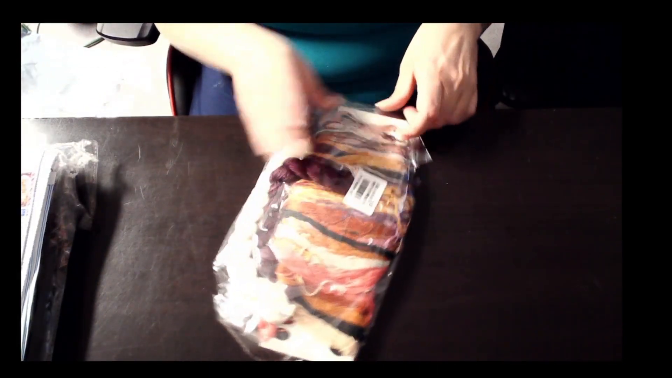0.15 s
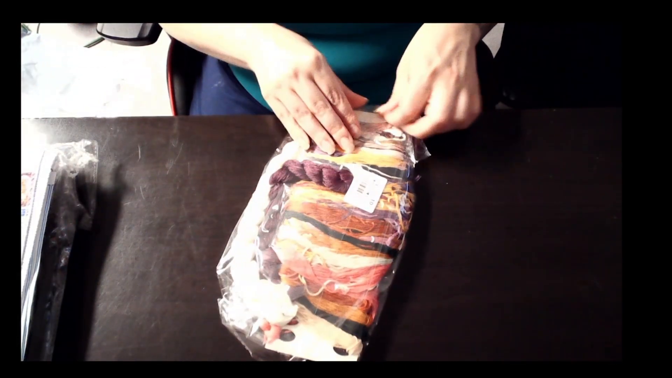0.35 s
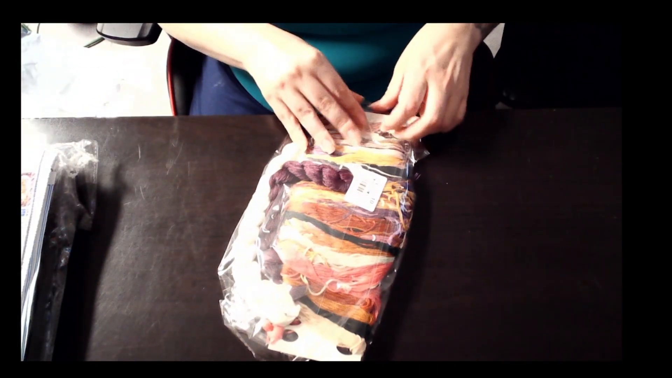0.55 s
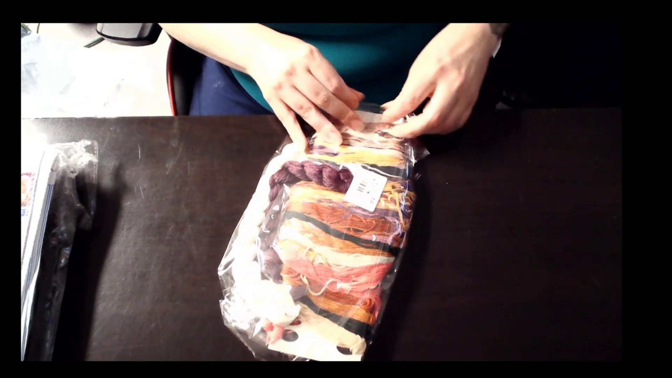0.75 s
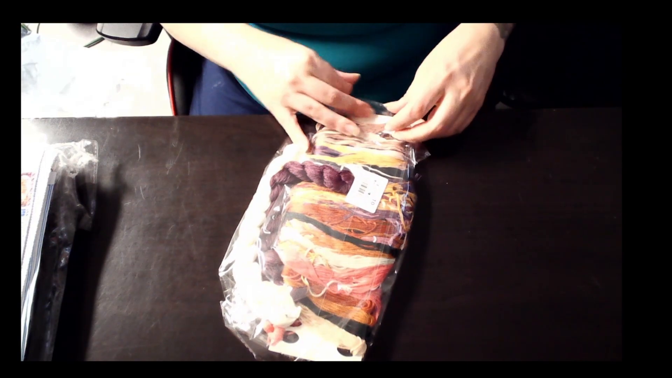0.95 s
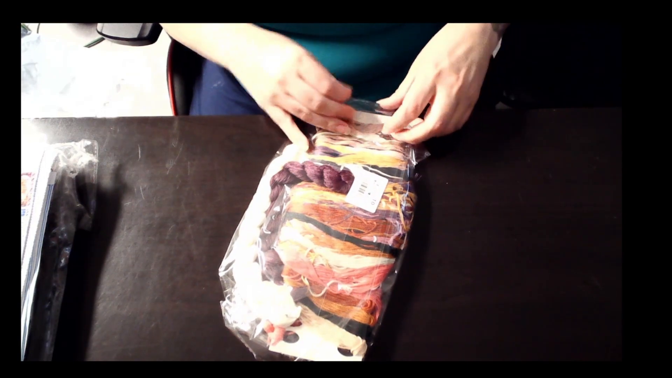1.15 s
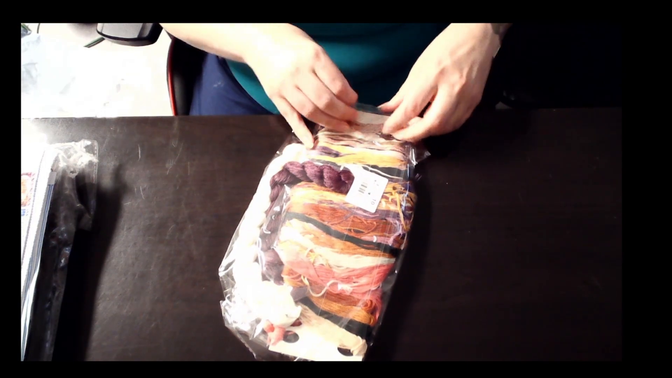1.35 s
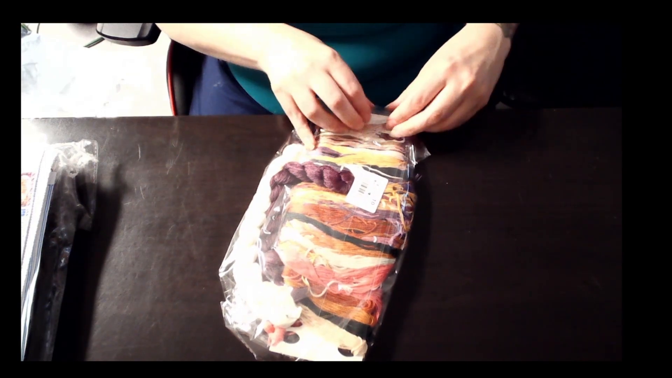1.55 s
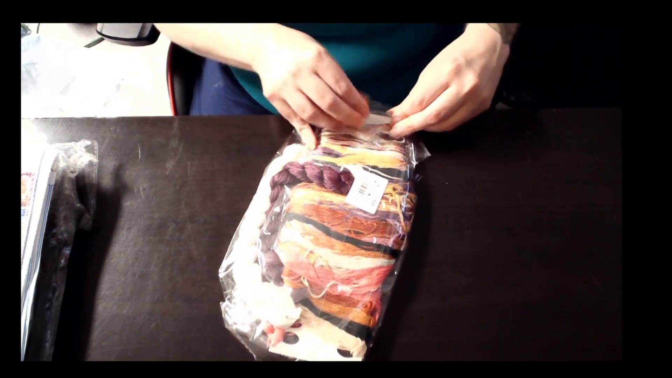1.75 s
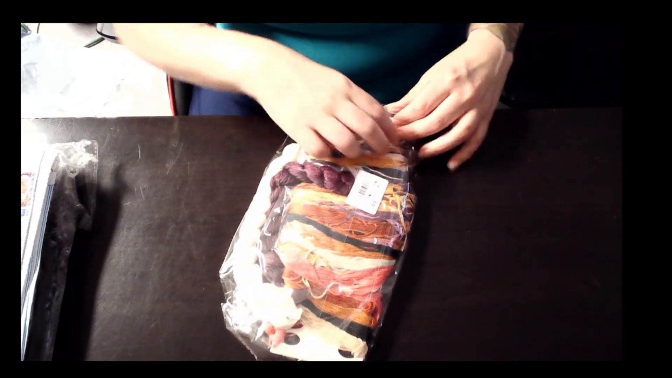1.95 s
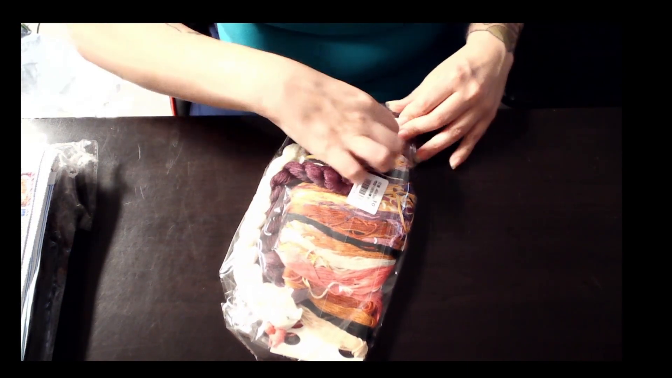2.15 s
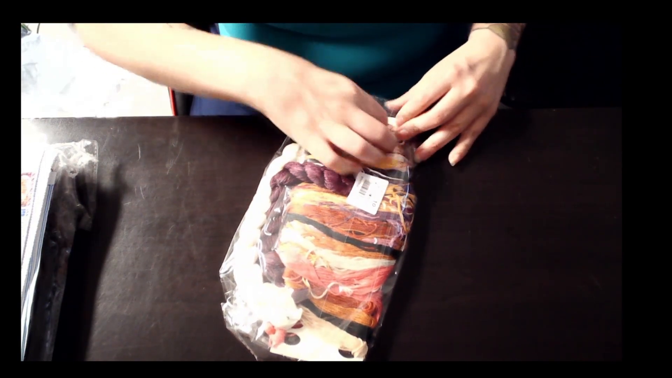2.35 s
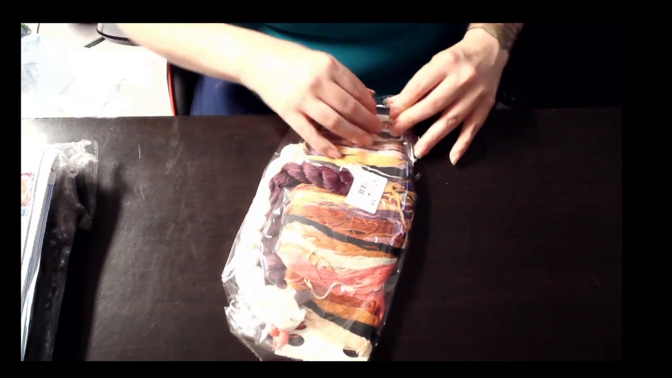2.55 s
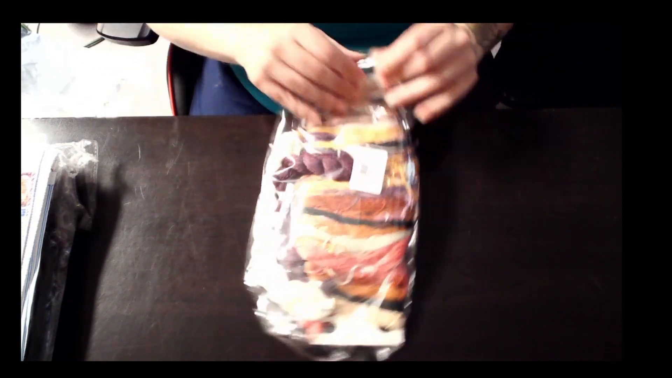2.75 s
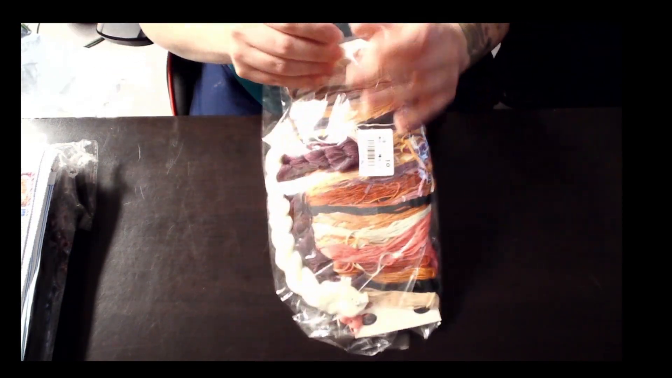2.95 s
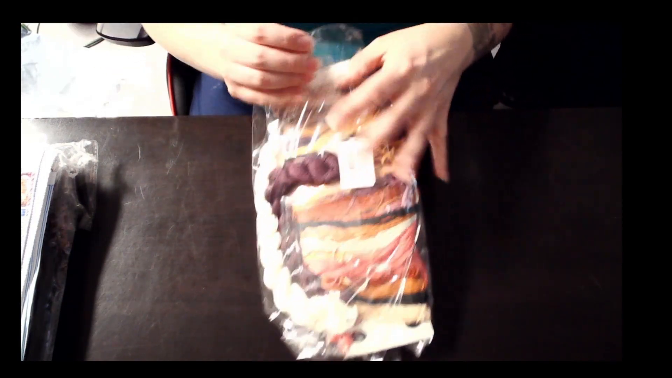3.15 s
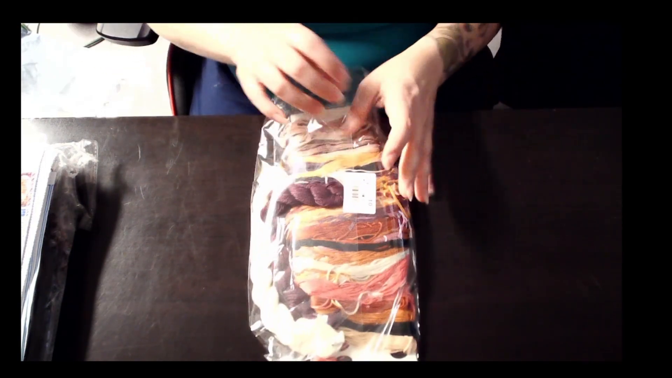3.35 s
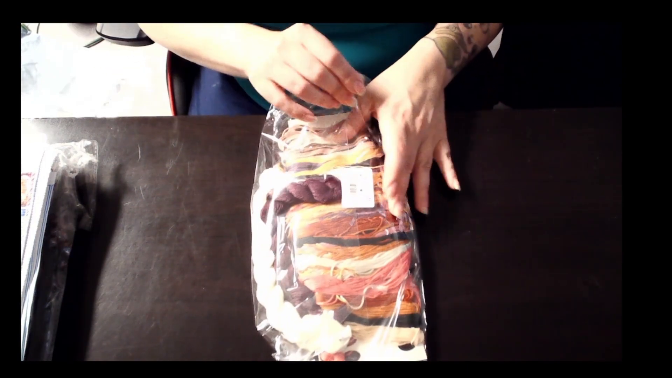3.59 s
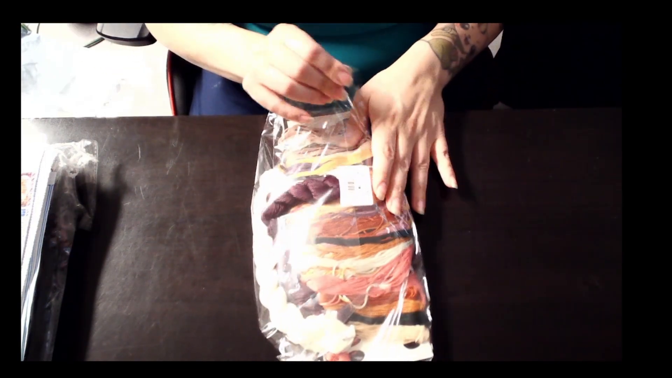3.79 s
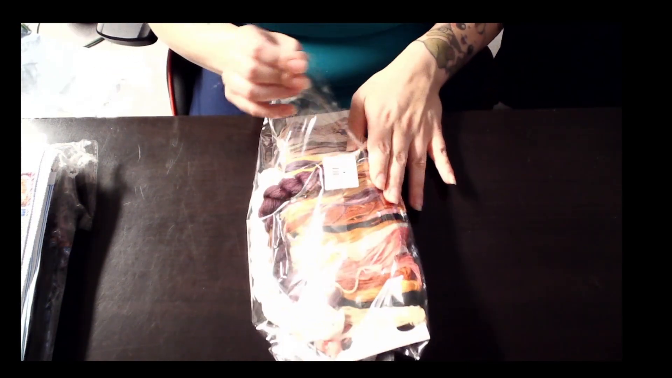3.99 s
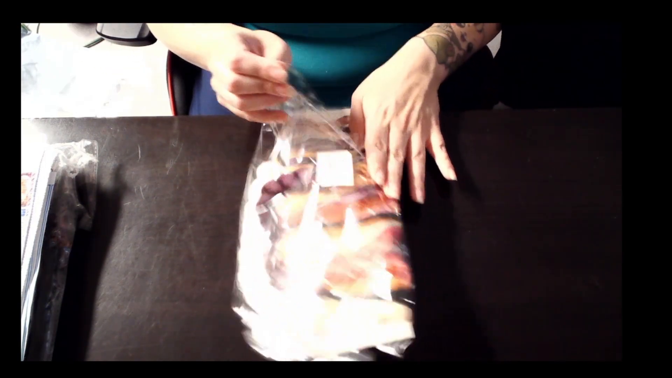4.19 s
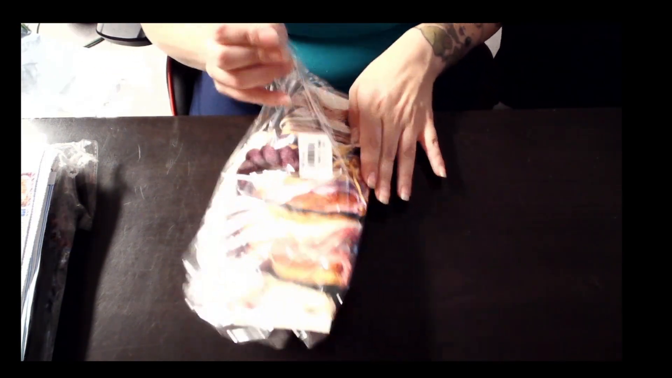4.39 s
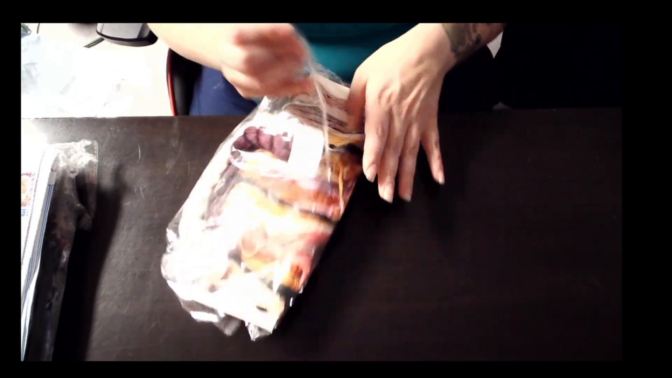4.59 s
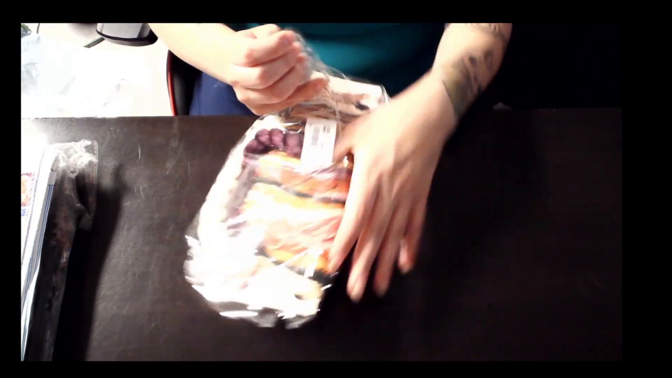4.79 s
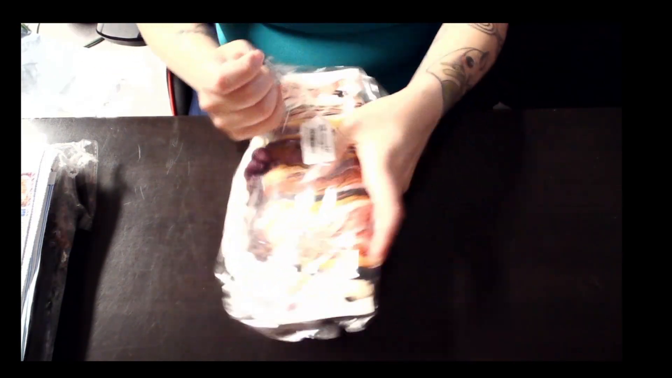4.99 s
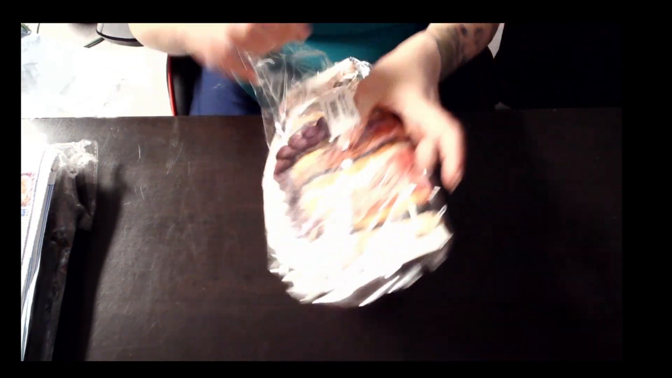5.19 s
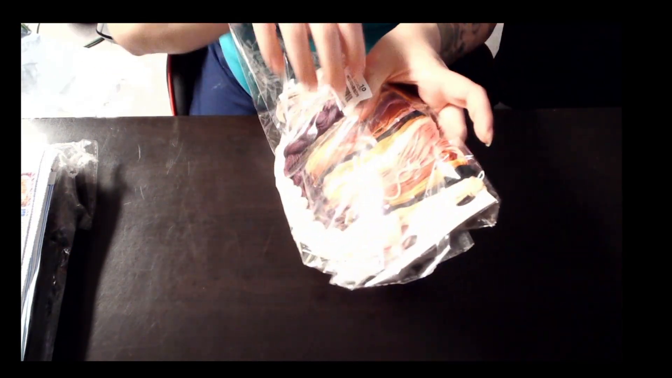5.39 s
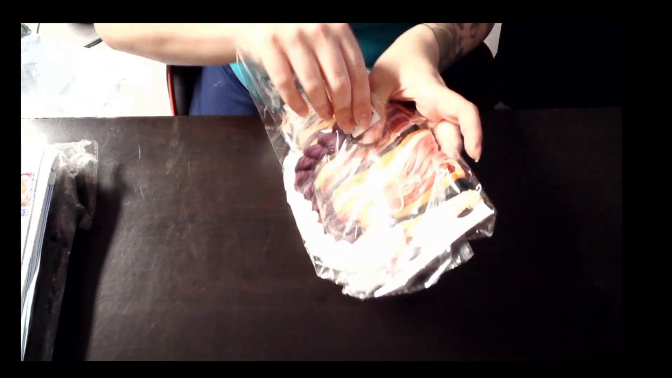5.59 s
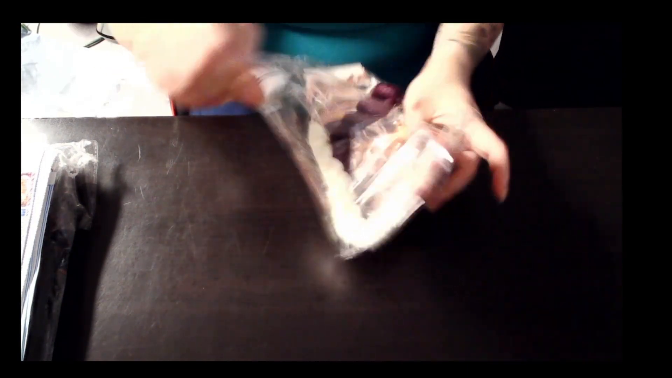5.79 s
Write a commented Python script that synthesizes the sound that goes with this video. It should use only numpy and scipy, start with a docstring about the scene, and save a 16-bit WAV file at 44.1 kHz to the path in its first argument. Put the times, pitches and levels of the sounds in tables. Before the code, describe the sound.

Fingers pick at thin crisp plastic with irregular ticks, small crackles and short gaps. Lifting and turning the bag brings busier rustling near the middle and stronger crackling later; after a brief lull the sharpest crush arrives last. The table gives only a faint low drone as the bag drags. Close and nearly dry, through a small band-limited microphone with low hiss.

```python
"""Hands pick at, turn and lift a stiff clear plastic bag full of soft yarn on a wooden table.
From the start creases snap one by one over a crackle: clustered noise bursts, each coloured by a ring.
From 0.4 s drags set the table top droning faintly: friction noise picked out by two modes.
Snaps crowd and grow near 2.7-3.0 s, again at 4.2-5.2 s, and are loudest at 5.7 s, just before the end.
A small narrow-band microphone dulls it all; a faint mirror image and hiss lie above and beneath."""
import sys
import numpy as np
from scipy import signal
from scipy.fft import rfft, irfft, next_fast_len
from scipy.io import wavfile
from scipy.ndimage import uniform_filter1d, map_coordinates

SR = 44100
rng = np.random.default_rng(int(sys.argv[2]) if len(sys.argv) > 2 else 0)


def master(y):
    """Save y as 16-bit WAV."""
    cut = np.clip(np.atleast_2d(y).T, -1, 1)
    pcm = np.round(cut * 32767)  # scale
    wavfile.write(sys.argv[1], SR, pcm.astype(np.int16))


def elevation(decibels):
    """Turn decibel levels (scalar or array-like) into linear amplitude ratios."""
    levels = np.asarray(decibels, float)
    return 10 ** (levels / 20)


N = 257367  # samples

# moves of the fingers on the film, before clumping: start [t/s], length [t/s],
# crackle at the start [level/dB], change by the end [level/dB], large folds re crackle [level/dB]
FINGER_MOVES = [(0, 0.097, -46.5, -17, -17.5), (0.113, 0.074, -56.5, -3.5, -25.5),
                (0.244, 0.15, -57, 3.5, -24), (0.436, 0.19, -58.5, -3, -24),
                (0.687, 0.019, -66.5, -8, -5.5), (0.777, 0.033, -73, 5, -23),
                (0.848, 0.096, -54, -7, -25.5), (0.987, 0.077, -64, 4, -17.5),
                (1.099, 0.054, -59.5, -1, -19.5), (1.2, 0.027, -59.5, 2.5, -27),
                (1.32, 0.047, -59, -3, -28), (1.412, 0.14, -59, -8, -23.5), (1.597, 0.033, -63.5, -2, -26),
                (1.678, 0.025, -50.5, -14, -21), (1.751, 0.083, -72.5, -5.5, -19),
                (1.865, 0.06, -58, 0, -20.5), (1.999, 0.19, -56, -5, -24), (2.251, 0.021, -73, -4, -21),
                (2.29, 0.047, -56.5, 1.5, -28), (2.382, 0.16, -66, 11, -20), (2.595, 0.1, -63.5, 15, -22),
                (2.705, 0.099, -51.5, -2, -19), (2.834, 0.21, -53, 7, -19.5), (3.085, .29, -60, 3, -16.5),
                (3.377, 0.092, -63.5, 3, -19), (3.505, 0.026, -52, 1, -13.5), (3.584, 0.18, -52, -4, -14.5),
                (3.832, 0.1, -45, -13, -14), (3.98, 0.035, -54.5, 1, -23.5),
                (4.105, 0.33, -64, -2.5, -14.5), (4.204, 0.018, -57.5, 7, -17.5),
                (4.252, 0.13, -39.5, -13.5, -15), (4.421, 0.083, -56, 4.5, -20.5),
                (4.563, 0.057, -50.5, 8.5, -17.5), (4.693, 0.037, -69.5, 0, -16),
                (4.737, 0.17, -52.5, -4.5, -16), (4.962, 0.1, -47.5, 0.5, -20.5),
                (5.108, 0.15, -50.5, -8, -19), (5.368, 0.065, -48, -26, -15),
                (5.444, 0.092, -61, -11.5, -18), (5.564, 0.082, -54.5, 10, -13.5),
                (5.687, 0.019, -29.5, -0.5, -16.5), (5.724, 0.13, -35, -14, -13.5)]
# snaps of single creases: onset [t/s], peak before the tick trim [level/dB], ring [f/Hz],
# body re that peak before the body trim [level/dB]
CREASE_SNAPS = [(0.0034, -23.5, 6950, -39), (0.0603, -37, 6650, -31), (0.1075, -44, 6500, -29),
                (0.1235, -39, 6800, -38), (0.1531, -31, 3320, -41), (0.2483, -46, 6200, -34),
                (0.2596, -36.5, 5830, -23), (0.2996, -36, 6740, -36), (0.3381, -30, 3600, -32),
                (0.3781, -36.5, 6400, -34), (0.4375, -35, 5800, -50), (0.4708, -36, 6300, -38),
                (0.478, -34, 6140, -19.5), (0.5469, -37, 5850, -27), (0.5535, -39, 5740, -26.5),
                (0.614, -33.5, 4770, -53), (0.6872, -32.5, 6700, -27), (0.7794, -32, 5760, -48),
                (0.836, -31.5, 4330, -50), (0.857, -32, 6800, -35), (0.8963, -32.5, 3950, -31),
                (0.9815, -42.5, 3730, -39), (0.9976, -38, 3270, -31), (1.0102, -37, 3220, -26),
                (1.0316, -42, 4480, -20), (1.0932, -42.5, 3700, -24), (1.1209, -35.5, 5800, -19),
                (1.1596, -35.5, 7000, -47), (1.2153, -37.5, 3600, -33), (1.2284, -40, 5940, -35),
                (1.276, -41.5, 3400, -32), (1.3213, -45.5, 3570, -44), (1.3443, -36, 6700, -51),
                (1.4088, -34.5, 3910, -32.5), (1.4626, -40, 6740, -27), (1.512, -38.5, 5600, -50),
                (1.5449, -35.5, 5050, -50), (1.6023, -29.5, 3880, -52), (1.6267, -34.5, 3690, -51),
                (1.6737, -31, 3480, -31), (1.701, -34.5, 5300, -46), (1.7438, -47.5, 5070, -36),
                (1.7953, -50, 6200, -48), (1.8635, -32.5, 5900, -53), (1.9886, -41.5, 4640, -34),
                (2.0057, -37, 3560, -37), (2.0505, -24.5, 5930, -29.5), (2.0827, -31, 6350, -40),
                (2.1097, -29.5, 3930, -33), (2.164, -36, 3500, -29), (2.179, -38.5, 3500, -45),
                (2.2204, -53, 5740, -23), (2.25, -38.5, 6440, -27), (2.2967, -30.5, 6400, -49),
                (2.322, -44, 6870, -37), (2.378, -39, 6770, -32), (2.406, -38.5, 6700, -23),
                (2.4613, -31, 3900, -53), (2.4862, -35.5, 6860, -36), (2.5182, -30, 3760, -36),
                (2.5379, -34, 4700, -36), (2.5884, -33, 6040, -46), (2.6506, -36, 6150, -30),
                (2.7063, -32.5, 3650, -23.5), (2.7188, -24, 6560, -35), (2.7827, -26.5, 7060, -38),
                (2.8419, -25.5, 3560, -39), (2.8797, -27.5, 7000, -24), (2.8844, -28.5, 6410, -14.5),
                (2.9303, -25, 5560, -28.5), (2.9506, -18, 5700, -26), (2.9903, -25, 5030, -25.5),
                (3.0098, -25, 5370, -27), (3.0182, -28.5, 5600, -30), (3.0544, -31.5, 6380, -23),
                (3.096, -33, 6760, -21), (3.1319, -36.5, 5670, -24), (3.169, -30, 6420, -27.5),
                (3.1914, -34.5, 6060, -32), (3.2298, -32, 6100, -21.5), (3.3211, -38, 5360, -38),
                (3.3426, -32.5, 4870, -33), (3.3646, -33, 6560, -37), (3.4515, -40, 3000, -27),
                (3.5051, -38.5, 6650, -13), (3.5795, -35, 5170, -35), (3.6586, -33.5, 3460, -24),
                (3.7546, -39, 7000, -9), (3.7744, -39, 6840, -21), (3.8247, -33, 6300, -19),
                (3.829, -34, 5500, -19), (3.8714, -24, 5200, -39), (3.9579, -34, 6600, -38),
                (4.0092, -31.5, 3680, -31), (4.0756, -34, 6200, -40), (4.0933, -40, 6860, -37),
                (4.124, -26.5, 6070, -49), (4.1704, -38.5, 6500, -35), (4.2287, -29, 5320, -35),
                (4.2351, -27, 4950, -42), (4.2422, -21, 5510, -37), (4.2681, -16.5, 6400, -47),
                (4.279, -16.5, 6460, -29), (4.3296, -22.5, 6890, -27), (4.35, -23.5, 6730, -30),
                (4.356, -25.5, 6540, -26), (4.3774, -26, 5830, -23), (4.4017, -24, 6890, -42),
                (4.4306, -22.5, 6040, -23), (4.4747, -34.5, 5400, -28), (4.4967, -23, 5600, -29.5),
                (4.54, -23.5, 7000, -33.5), (4.572, -29, 6700, -30), (4.5947, -23, 5400, -24),
                (4.6146, -22.5, 2950, -35), (4.6314, -37, 4830, -39), (4.6847, -33, 6700, -38),
                (4.7485, -22.5, 5700, -38), (4.8009, -22.5, 3680, -34), (4.808, -26, 3680, -42.5),
                (4.8556, -26, 6900, -34), (4.8797, -25.5, 4640, -29), (4.8893, -20, 7050, -41),
                (4.9347, -25, 5900, -49), (4.9506, -26, 6810, -41), (4.995, -22, 5200, -30),
                (5.0276, -24.5, 5050, -28.5), (5.0624, -24.5, 6220, -20), (5.1452, -24.5, 6360, -19.5),
                (5.1564, -24, 5800, -30), (5.26, -37, 3870, -39), (5.2744, -34.5, 4520, -30.5),
                (5.3598, -30, 6900, -23), (5.4043, -35.5, 6790, -35), (5.4405, -40, 5860, -36),
                (5.456, -33, 5400, -25.5), (5.5153, -39.5, 6680, -47), (5.5705, -40.5, 6700, -5.5),
                (5.6028, -38, 5070, -26), (5.6426, -32, 3330, -34), (5.6584, -25, 5000, -24.5),
                (5.677, -25, 6700, -21), (5.69, -9.5, 6760, -35), (5.697, -15.5, 6900, -21),
                (5.7043, -15, 6700, -32), (5.724, -25, 4090, -27), (5.742, -15.5, 6000, -24),
                (5.7501, -17.5, 6270, -25), (5.7628, -23, 5870, -27), (5.7694, -25, 4600, -25),
                (5.7825, -29, 4800, -23), (5.7936, -24.5, 5900, -18), (5.8028, -24, 6790, -31),
                (5.8187, -31.5, 5810, -20)]
# spectrum of small creases: [f/Hz], relative [level/dB]
SMALL_CREASE_SPECTRUM = [(1500, -48.5), (2500, -7.5), (3400, -4.5), (5700, -5.5), (6900, -2), (9000, -6.5)]
# spectrum of large folds: [f/Hz], relative [level/dB]
LARGE_FOLD_SPECTRUM = [(200, -32.5), (500, -15), (900, -12.5), (1300, -8.5), (1650, -3), (2100, -1),
                       (2700, -6.5), (3500, -7.5), (5000, -35.5)]
# reverberation: [f/Hz], time to fall 60 dB [t/s]
REVERB_TIME = [(300, 0.14), (2500, 0.15), (7000, 0.14)]
# drags of the bag over the table, before wavering: start [t/s], length [t/s],
# drone [level/dB], rumble [level/dB]
BAG_DRAGS = [(0.437, 0.05, -91, -100), (0.686, .01, -82, -94), (0.863, 0.047, -80.5, -100),
             (1.091, 0.015, -81.5, -100), (1.49, 0.0047, -82, -86.5), (1.967, 0.022, -94, -90.5),
             (2.178, 0.078, -78, -86), (2.434, 0.069, -89, -93), (2.806, 0.094, -77, -93),
             (2.93, 0.1, -70, -83), (3.208, 0.11, -80, -86), (3.634, 0.0071, -78, -81),
             (3.71, 0.009, -89, -100), (3.935, 0.023, -94, -93), (4.263, .05, -79.5, -71),
             (4.34, 0.052, -83, -80.5), (4.614, 0.23, -73, -82), (4.984, 0.026, -74, -82.5),
             (5.077, 0.013, -75, -72.5), (5.12, 0.046, -76.5, -89), (5.24, .03, -83, -100),
             (5.359, 0.0051, -77.5, -79.5), (5.506, 0.12, -78.5, -87), (5.695, 0.038, -72.5, -67.5)]
# brisk slides that wake the upper mode, before wavering: start [t/s], length [t/s], [level/dB]
BRISK_SLIDES = [(2.702, 0.15, -89), (2.83, 0.14, -78), (5.012, 0.15, -78)]
# modes of the table top, lower then upper: centre [f/Hz], width before the skirts are steepened [f/Hz]
TABLE_MODES = [(195, 36.3), (635, 63)]
# spectrum of the sliding rumble: [f/Hz], relative [level/dB]
RUMBLE_SPECTRUM = [(15, -45), (35, -15), (90, 1.5), (140, -3.5), (300, -8), (550, -23.5), (900, -23.5)]
# noise estimate of the suppressor: [f/Hz], per transform bin [level/dB]
NOISE_ESTIMATE = [(100, -114), (600, -102), (1500, -103), (2500, -94.5), (4000, -102), (7500, -102)]
# band edge of the microphone: [f/Hz], gain [level/dB]
MICROPHONE_BAND = [(7100, 2.5), (7400, -1), (7700, -18.5), (7900, -31), (8300, -60.5), (9000, -99)]
# response that shapes the mirror image: [f/Hz], gain [level/dB]
MIRROR_RESPONSE = [(7800, -89.5), (8100, 0.5), (8500, -14.5), (8900, -28.5), (9200, -43.5), (10000, -63),
                   (16000, -89)]
# spectrum of the hiss: [f/Hz], relative [level/dB]
HISS_SPECTRUM = [(20, 3), (200, -4), (600, -6), (2500, -5), (7000, -25.5), (8000, -12.5), (11000, -18),
                 (15500, -29), (16000, -35)]

GRIP_DB_PER_S, LET_GO_DB_PER_S = 996.5, 500.5  # how a move starts and stops
SETTLING_DB, SETTLING_FOLDS_DB = -85.5, -94  # the film creeping between moves, before clumping
CRUSH_DB = -43.5  # about this level the many creases giving at once even the crackle out
RISE_DB_PER_S, FALL_DB_PER_S = 491, 388  # how a drag starts and stops
REST_DRONE_DB, REST_RUMBLE_DB = -101, -100  # the table with the bag at rest, before wavering
INNER_RATE_HZ = 16000
LEAD_S = 0.002  # room for the rise of a burst ahead of its flip


def unit(x):
    """Normalisation to unit root-mean-square amplitude."""
    return x / np.sqrt(np.mean(x ** 2) + 1e-20)


def along(points, hz):
    """Interpolation of (f/Hz, value) points on a logarithmic frequency axis."""
    f, v = np.transpose(points)
    return np.interp(np.log(hz + 1), np.log(f + 1), v)


def wobble(rate):
    """Slow random modulation: a smooth curve through rate random knots a second."""
    knots = rng.standard_normal(int(N * rate / SR) + 4)
    return map_coordinates(knots, [np.arange(N) * rate / SR])


def filtered(x, response):
    """Linear filtering: the spectrum of x is multiplied by a response of frequency."""
    m = next_fast_len(N + 8192)
    return irfft(rfft(x, m) * response(np.fft.rfftfreq(m, 1 / SR)), m)[:N]


def coloured(x, spectrum):
    """Spectral shaping of x by (f/Hz, level/dB) points."""
    return filtered(x, lambda hz: elevation(along(spectrum, hz)))


def strokes(start, length, rise_db_per_s, fall_db_per_s, *levels_db, change_db=0):
    """Exponential envelopes, one per level column: strokes rise, drift in level over their length and fall."""
    hop = 64  # samples
    t = np.arange(0, N + hop, hop) / SR - start[:, None]
    length = np.maximum(length, 1e-3)[:, None]
    shape_db = rise_db_per_s * np.minimum(t, 0) - fall_db_per_s * np.maximum(t - length, 0)
    shape_db = shape_db + np.reshape(change_db, (-1, 1)) * np.clip(t / length, 0, 1)
    knots = np.arange(t.shape[1]) * hop
    return [np.interp(np.arange(N), knots, elevation(db[:, None] + shape_db).sum(axis=0)) for db in levels_db]


def bursts(decay_s, spectrum, ring_hz, octaves, broad_db, size=512):
    """Buckling: a sharp flip in a fast-rising, dying noise burst, strongest near its ring; rows of peak 1."""
    t, hz = np.arange(size) / SR - LEAD_S, np.fft.rfftfreq(size, 1 / SR)
    shape = np.exp(-np.where(t < 0, -t / 0.28, t) / decay_s[:, None])
    push = rng.standard_normal((len(ring_hz), size)) * shape
    flip = np.abs(t).argmin()
    push[:, flip] *= 1 + 4.35 / np.abs(push[:, flip])  # adds 4.35 to its size, keeping the sign
    ring = np.exp(-0.5 * (np.log2((hz + 1) / ring_hz[:, None]) / octaves) ** 2)
    rows = irfft(rfft(push) * elevation(along(spectrum, hz)) * (ring + elevation(broad_db)), size)
    return rows / np.abs(rows).max(axis=1, keepdims=True)


def placed(s, rows):
    """Superposition of bursts at their times s."""
    start = np.round((s - LEAD_S) * SR).astype(int).clip(0)
    where = start[:, None] + np.arange(rows.shape[1])
    return np.bincount(where.ravel(), rows.ravel(), N + SR)[:N]


def crackle(spectrum, centre_hz, spread, decay_s, octaves, uneven_db, most_db, count):
    """Random superposition: many small creases at random moments, a few larger than most; rms 1."""
    draw, when = rng.standard_normal((count, 2)), rng.random((count, 2))
    life_s = decay_s * np.exp(0.44 * draw[:, 0])
    ring_hz = centre_hz * np.exp(spread * draw[:, 1])
    rows = bursts(life_s, spectrum, ring_hz, octaves, broad_db=-5.5)
    size_db = np.minimum(-uneven_db * np.log(when[:, 1]), most_db)
    return unit(placed(when[:, 0] * N / SR, elevation(size_db)[:, None] * rows))


def film_crackle():
    """Clustered buckling: moves set off small and large creases in shared clumps; hard ones crush to a roar."""
    start, length, db, change_db, under_db = np.transpose(FINGER_MOVES)
    fine_gain, folds_gain = strokes(start, length, GRIP_DB_PER_S, LET_GO_DB_PER_S,
                                    db, db + under_db, change_db=change_db)
    crushed = fine_gain ** 2 / (fine_gain ** 2 + elevation(2 * CRUSH_DB))  # share of power, 0 to 1
    clumps = wobble(45) * (1 - 0.6 * crushed)

    fine = crackle(SMALL_CREASE_SPECTRUM, 5350, 0.4, 0.001, octaves=0.32,
                   uneven_db=7.0, most_db=11.5, count=2600)
    folds = crackle(LARGE_FOLD_SPECTRUM, 1623, 0.61, 0.0029, octaves=0.11,
                    uneven_db=2.0, most_db=6.5, count=2000)
    roar = crackle(SMALL_CREASE_SPECTRUM, 5400, 0.4, 0.001, octaves=0.33,
                   uneven_db=4.5, most_db=5.5, count=7000)
    fine = np.sqrt(1 - crushed) * fine + np.sqrt(crushed) * roar

    small = elevation(2.8 * clumps) * (fine_gain + elevation(SETTLING_DB)) * fine
    large = elevation(2.57 * clumps) * (folds_gain + elevation(SETTLING_FOLDS_DB)) * folds
    return small + large


def snaps():
    """Impulsive release: each snap is a bright tick with a duller, slower thump of the fold around it."""
    s, db, hz, body_db = np.transpose(CREASE_SNAPS)
    life = np.exp(0.34 * rng.standard_normal((len(s), 2)))
    tick = bursts(0.0012 * life[:, 0], SMALL_CREASE_SPECTRUM, hz, octaves=0.22, broad_db=-11.5)
    body = bursts(0.0014 * life[:, 1], LARGE_FOLD_SPECTRUM, 0.4 * hz, octaves=0.11, broad_db=-14.0)
    tick_gain, body_gain = elevation(db + 2.5), elevation(db + body_db + 4.0)  # with the trims
    return placed(s, tick_gain[:, None] * tick + body_gain[:, None] * body)


def room(x):
    """Reverberation off table top and walls: decaying noise; each third of a second meets a fresh tail."""
    out, step = np.zeros(N + SR), SR // 3
    for start in range(0, N, step):
        hz, t, z = signal.stft(rng.standard_normal(SR // 4), SR, nperseg=256)
        decay = elevation(-60 * t / along(REVERB_TIME, hz)[:, None])
        tail = signal.istft(z * decay, SR, nperseg=256)[1]
        wet = signal.fftconvolve(x[start:start + step], tail / np.linalg.norm(tail))
        out[start:start + len(wet)] += wet
    return out[:N]


def mode_response(centre, width):
    """Resonance of one table mode, its skirts steepened by a power."""
    return lambda f: (1j * f * width / (centre * centre - f * f + 1j * f * width)) ** 1.77


def table():
    """Sliding friction: broadband noise from which the modes of the table top select, over a low rumble."""
    start, length, drone_db, rumble_db = np.transpose(BAG_DRAGS)
    drone, rumble = strokes(start, length, RISE_DB_PER_S, FALL_DB_PER_S, drone_db, rumble_db)
    start, length, upper_db = np.transpose(BRISK_SLIDES)
    upper, = strokes(start, length, RISE_DB_PER_S, FALL_DB_PER_S, upper_db)

    friction = unit(coloured(rng.standard_normal(N), RUMBLE_SPECTRUM))
    out = (rumble + elevation(REST_RUMBLE_DB)) * elevation(2.8 * wobble(7.3)) * friction
    for (centre, width), gain in zip(TABLE_MODES, [drone + elevation(REST_DRONE_DB), upper]):
        ringing = unit(filtered(rng.standard_normal(N), mode_response(centre, width)))
        out = out + gain * elevation(2.5 * wobble(26)) * ringing
    return out


def scene():
    """Superposition of the bag, its echo and the table."""
    bag = film_crackle() + snaps()
    return (bag + elevation(-10) * room(bag) + table())[None]


def suppressed(x):
    """Spectral subtraction: wherever a band sinks towards the noise estimate, it is turned down."""
    hz, _, z = signal.stft(x, SR, nperseg=512, noverlap=384)
    power = uniform_filter1d(np.abs(z) ** 2, size=7, axis=0)  # smoothed over frequency
    power = uniform_filter1d(power, size=5, axis=1)  # and over time
    noise = elevation(2 * along(NOISE_ESTIMATE, hz))[:, None]
    # the power of 1.5 deepens the floor to -23.25 dB
    gain = np.clip(1 - noise / (np.abs(power) + 1e-20), elevation(-15.5), 1) ** 1.5
    return signal.istft(z * gain, SR, nperseg=512, noverlap=384)[1][:N]


def mirror_image(narrow):
    """Aliasing: a low inner sampling rate leaves a weak mirror image above half that rate."""
    carrier = np.cos(2 * np.pi * INNER_RATE_HZ * np.arange(N) / SR)
    return coloured(2 * narrow * carrier, MIRROR_RESPONSE)


def hiss():
    """Stationary noise: a faint, steady coloured hiss."""
    return elevation(-87.5) * unit(coloured(rng.standard_normal(N), HISS_SPECTRUM))


def roll_off(x):
    """The treble ends steeply here."""
    return signal.sosfilt(signal.butter(12, 15700, fs=SR, output="sos"), x)


def record(dry):
    """Band limitation: noise suppression and a cut treble, then the mirror image and hiss are added."""
    narrow = coloured(suppressed(dry[0]), MICROPHONE_BAND)
    mix = narrow + mirror_image(narrow) + hiss()
    return roll_off(mix)


dry = scene()
out = record(dry)
master(out)
```